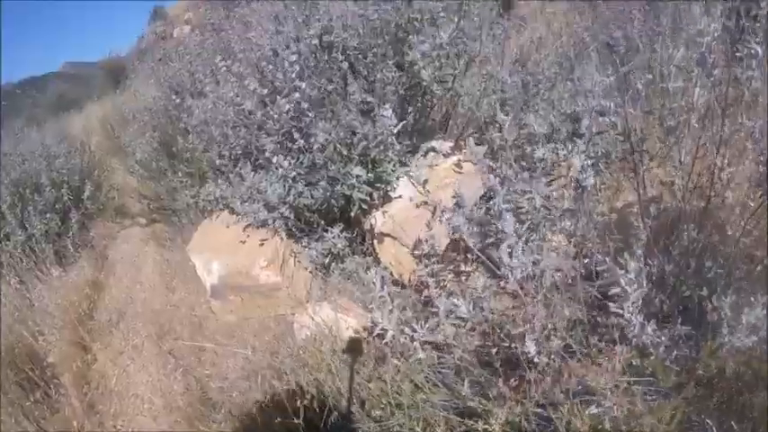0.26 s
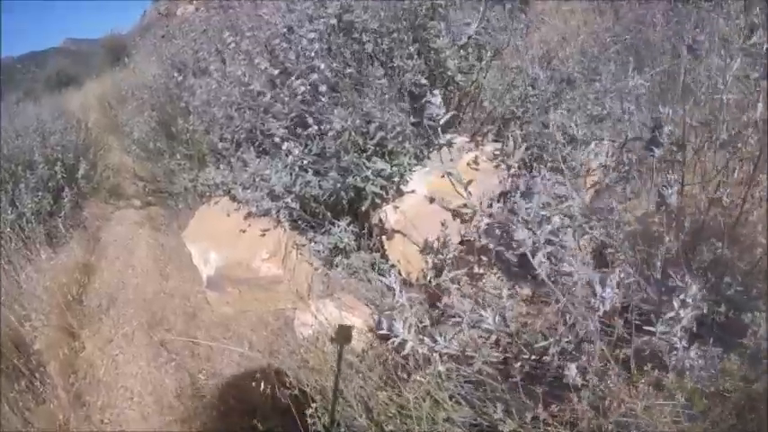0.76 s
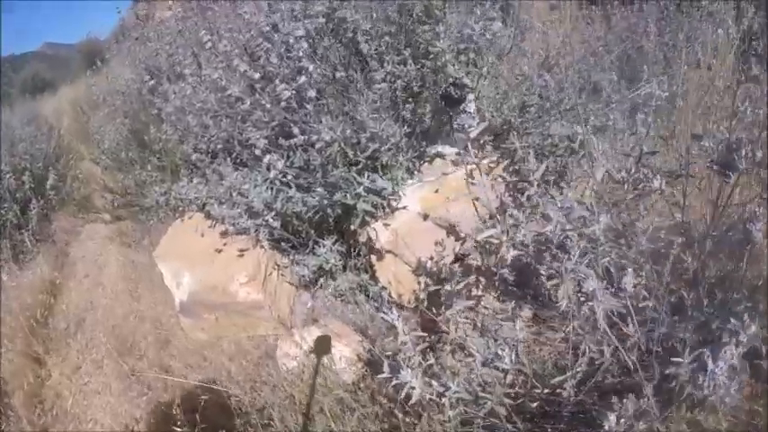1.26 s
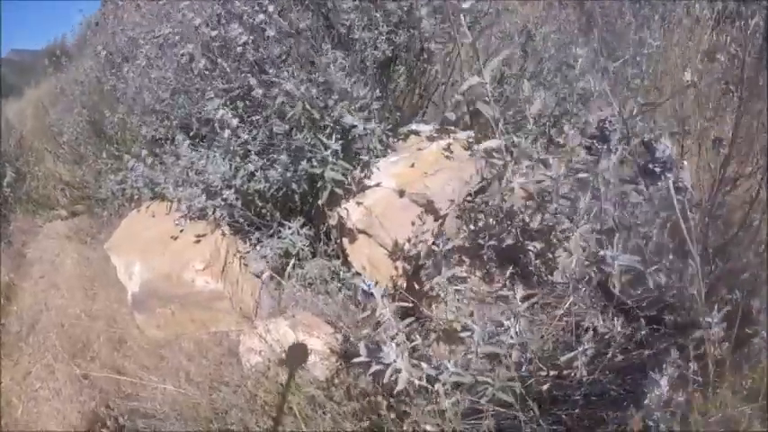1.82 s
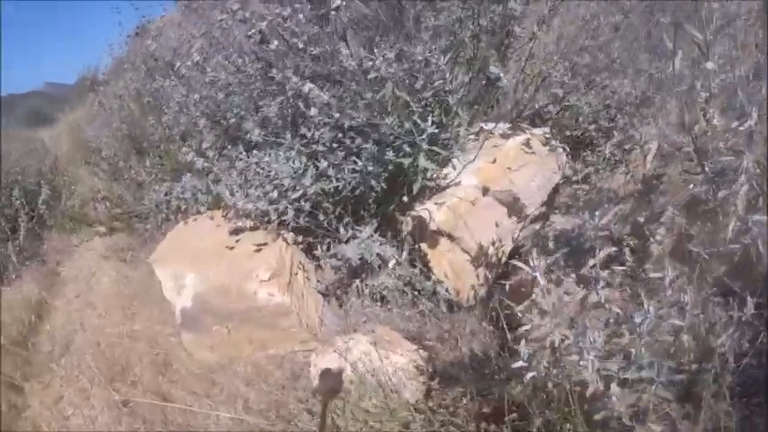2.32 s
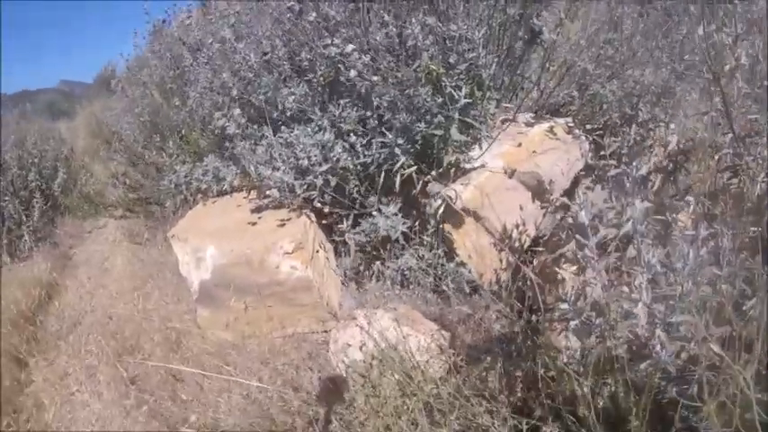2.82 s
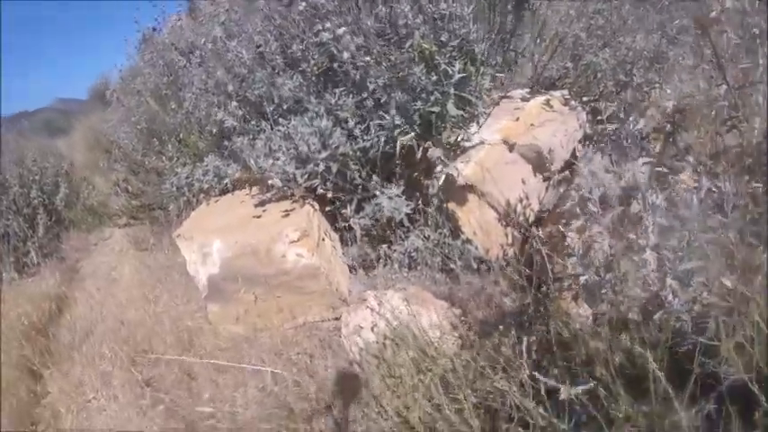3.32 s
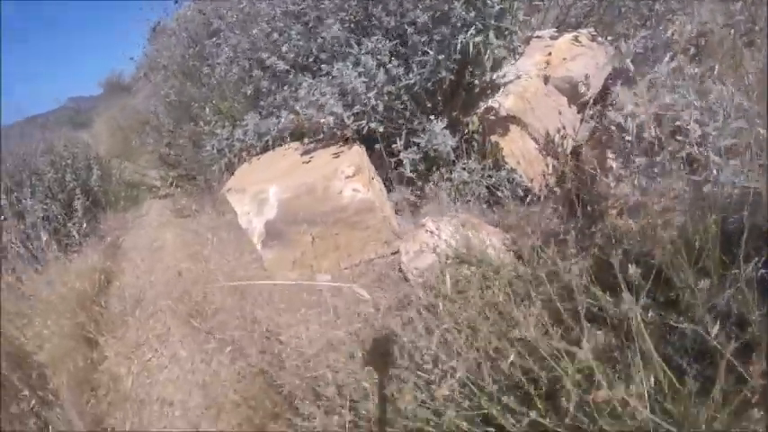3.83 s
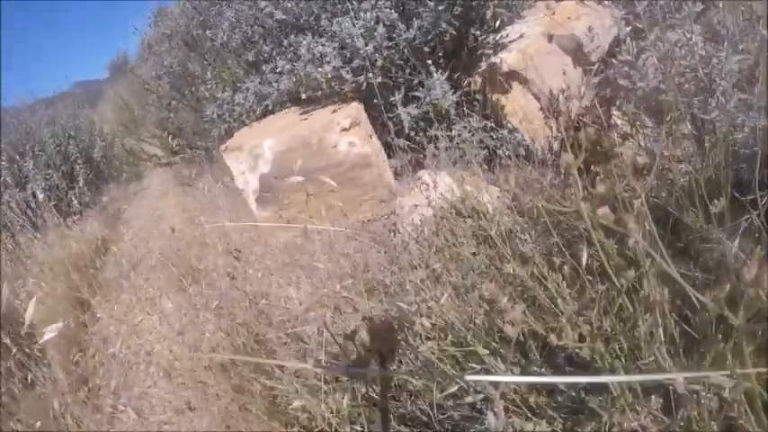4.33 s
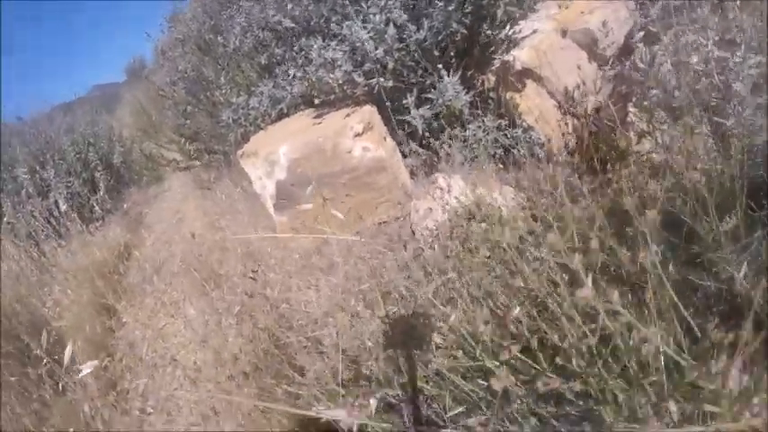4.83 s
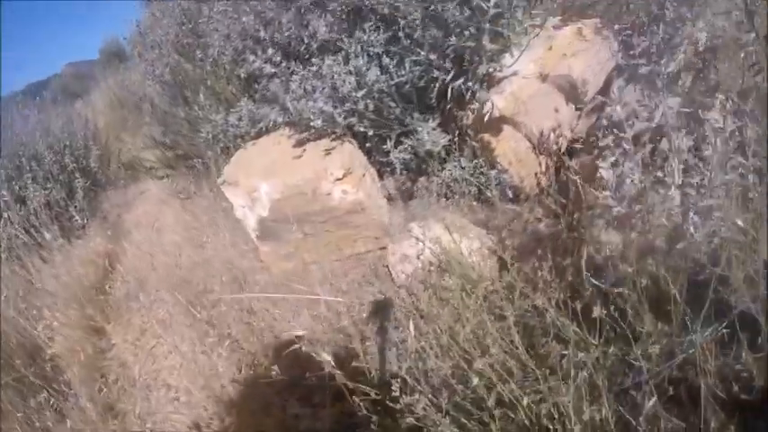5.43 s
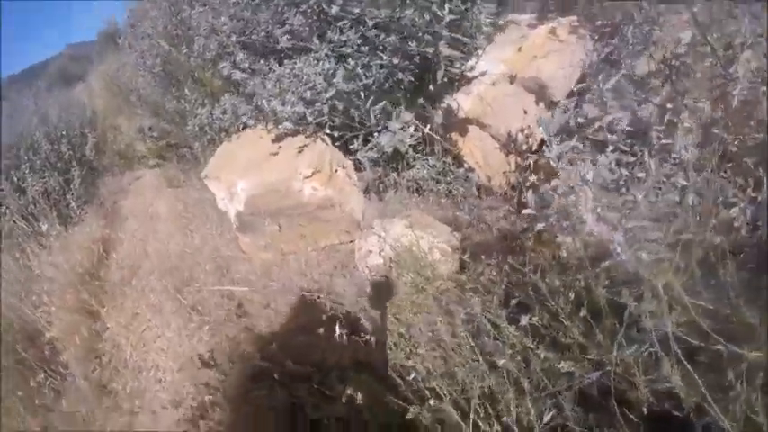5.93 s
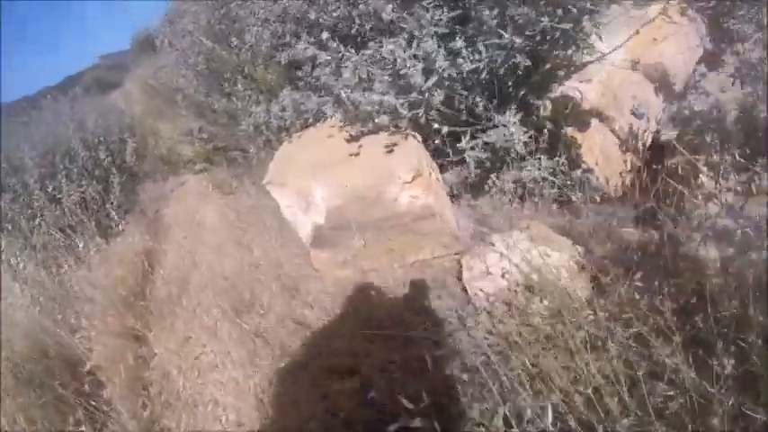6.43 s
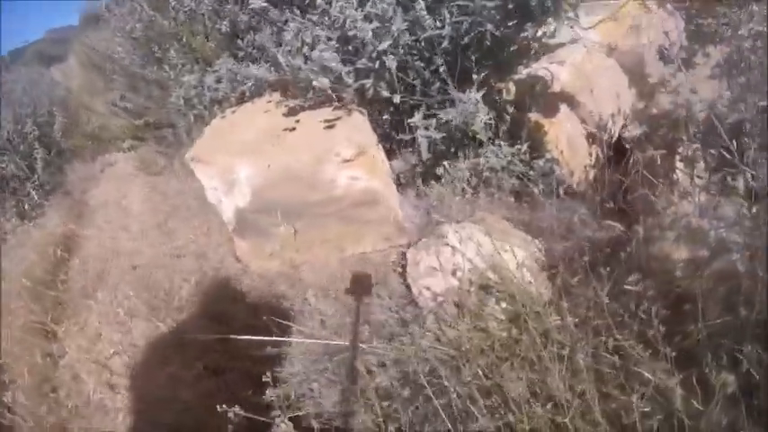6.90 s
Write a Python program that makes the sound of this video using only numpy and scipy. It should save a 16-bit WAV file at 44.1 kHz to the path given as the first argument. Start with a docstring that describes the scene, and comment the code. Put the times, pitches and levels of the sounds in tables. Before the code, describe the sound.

A rattlesnake buzzes from start to finish, about seven seconds, on an open trail among rocks and brush. The sound is a dry, high, very fast rattle that blurs into a hiss, slowing slightly and changing tone as the microphone moves. It is loudest around 2 seconds, drops noticeably from about 4 to 5 seconds, and comes back by 5.5 seconds, a little softer than at first.

Close up, the hand holding the microphone makes a low rumble with rubbing and soft thumps. Dull taps stand out near 1.7 and 2.3 seconds, and the rumble swells between 3 and 4.7 seconds. Small creaking ticks from the case are scattered throughout and cluster between 4 and 5 seconds, and one light plastic knock comes at 6.5 seconds. Very faint scuffs in dry grass occur near 2.3, 5.8 and 6.5 seconds, over a faint, even rush of air.

```python
"""A brushy trail among rocks, heard through the microphone of a hand-held camera.
Behind the rocks a rattlesnake buzzes: each tail stroke throws its loose segments together, and the
strokes slow a little as it goes on. Stone and brush scatter and colour the buzz differently as the
listener shifts about in the dry grass. Right at the microphone the hand rumbles, rubs and thumps,
and the case creaks in small ticks and knocks once. Faint open air lies under it all."""
import sys
import numpy as np
from scipy import signal
from scipy.fft import rfft, irfft, next_fast_len
from scipy.io import wavfile
from scipy.ndimage import uniform_filter1d, map_coordinates

SR = 44100
rng = np.random.default_rng(int(sys.argv[2]) if len(sys.argv) > 2 else 0)


def digitize_waveform(pressure):
    """Quantize a signal to 16-bit integers and store it at the path in sys.argv[1].

    Rows of a 2-D input are taken as channels; values are limited to [-1, 1].
    """
    field = np.atleast_2d(pressure).T
    bounded = np.clip(field, -1, 1)
    quanta = np.round(bounded * 32767).astype(np.int16)
    wavfile.write(sys.argv[1], SR, quanta)


N = 315756
TIME_S = np.arange(N) / SR


def amp(db):
    return 10 ** (np.asarray(db) / 20)


def unit_rms(x):
    return x / np.sqrt(np.mean(x ** 2) + 1e-20)


def curves(rows):
    """One value per sample for each column after the time."""
    times, *columns = np.transpose(rows)
    return [np.interp(TIME_S, times, column) for column in columns]


def wobble(knots_per_s):
    """A smooth random curve about zero."""
    knots = rng.standard_normal(int(N * knots_per_s / SR) + 4)
    return map_coordinates(knots, [TIME_S * knots_per_s])


def swell(centre_s, half_length_s):
    """A bell-shaped rise and fall of height 1."""
    return np.exp(-.5 * ((TIME_S - centre_s) / half_length_s) ** 2)


def surges(rest_db, events):
    """A resting level with (centre_s, level_db, half_length_s) swells added in power."""
    swell_power = sum((amp(db) * swell(s, length)) ** 2 for s, db, length in events)
    return np.sqrt(amp(rest_db) ** 2 + swell_power)


def filtered(x, response):
    """x through a complex response of frequency."""
    size = next_fast_len(N + SR // 2)
    return irfft(rfft(x, size) * response(np.fft.rfftfreq(size, 1 / SR)), size)[:N]


def colour(x, spectrum):
    """x shaped by (freq_hz, gain_db) points; rms 1."""
    freq_hz, gain_db = np.transpose(spectrum)
    return unit_rms(filtered(x, lambda hz: amp(np.interp(np.log(hz + 1), np.log(freq_hz), gain_db))))


def noise(spectrum):
    return colour(rng.standard_normal(N), spectrum)


def resonate(x, modes):
    """x through parallel (pitch_hz, width_hz, gain_db) resonances."""
    return filtered(x, lambda f: sum(amp(db) * 1j * f * width / (hz * hz - f * f + 1j * f * width)
                                     for hz, width, db in modes))


def steady(x, span_s):
    """x with its chance swells partly evened out; rms 1."""
    power = uniform_filter1d(x ** 2, max(int(span_s * SR), 1))
    return unit_rms(x / np.sqrt(abs(power) + 0.21))


def band_gain(f, bands):
    """Gain at f of bell-shaped (centre_hz, width_hz, gain_db) peaks and nulls."""
    return amp(sum(db * np.exp(-((f - hz) / width) ** 2) for hz, width, db in bands))


def add(track, start_s, sound):
    """Mix a sound into the track."""
    part = track[max(round(start_s * SR), 0):][:len(sound)]
    part += sound[:len(part)]


# air all around the trail: freq_hz, gain_db
AIR_SPECTRUM = [(30, -10), (200, 1), (420, 0.5), (600, -2.5), (1400, -3.5), (2400, -4), (5000, 2),
                (11000, -11), (14000, -17)]

def open_air(level_db=-54.5):
    """A faint even rush of open air over the hillside."""
    return amp(level_db) * noise(AIR_SPECTRUM)


# shoes in the grass below the microphone: centre_s, level_db, half_length_s
SHOE_SCUFFS = [(2.273, -62, 0.016), (2.34, -57, 0.036), (5.704, -60, 0.016), (5.831, -56.5, 0.014),
               (6.458, -61, 0.033)]
# dry stalks: freq_hz, gain_db
STRAW_SPECTRUM = [(150, 0), (400, 2), (1200, 5.5), (2400, -1), (5000, -14), (12000, -27)]

def grass_scuffs():
    """A shifting foot crushes dry stalks in a short crackly swell."""
    pressure = sum(amp(db) * swell(s, length) for s, db, length in SHOE_SCUFFS)
    crackle = rng.standard_normal(N) * amp(2.3 * wobble(400))
    return pressure * colour(crackle, STRAW_SPECTRUM)


# rumble of the moving microphone: freq_hz, gain_db
SWAY_SPECTRUM = [(12, -17), (20, -8), (35, -1), (46, 1), (57, -5), (72, -29), (110, -31), (250, -74)]
# the hand's constant slight sway: time_s, level_db
HAND_TREMOR = [(0, -49.5), (.35, -52.5), (.7, -47), (2.1, -46.5), (2.8, -44), (3.9, -45.5), (7.16, -44.5)]
# jolts of the arm: centre_s, level_db, half_length_s
ARM_JOLTS = [(1.63, -42.5, .07), (3.11, -38, 0.068), (3.43, -38, 0.046), (3.632, -34, 0.029),
             (4.332, -36.5, 0.054), (4.532, -34.5, 0.018), (4.702, -39.5, 0.066), (5.056, -42, 0.073),
             (5.833, -40, 0.073), (6.008, -39, 0.04), (6.12, -39, .028), (6.292, -41, 0.019),
             (6.902, -41, 0.081)]

def camera_sway():
    """The hand sways the camera into a deep rumble, more at each jolt."""
    rumble = steady(noise(SWAY_SPECTRUM), span_s=0.096)
    return surges(curves(HAND_TREMOR)[0], ARM_JOLTS) * rumble


# low resonances of the case around the microphone: pitch_hz, width_hz, gain_db
CASE_MODES = [(134.5, 23, 1.5), (209.4, 22, -14.5)]
# skin on the case, and the case's broad boom: freq_hz, gain_db
RUB_SPECTRUM = [(35, -22), (62, 3), (85, 0.5), (115, -4.5), (140, -21), (175, -33), (250, -44)]
BOOM_SPECTRUM = [(70, -52), (120, 1), (165, -6.5), (230, -14), (290, -29), (500, -33), (1200, -75)]
# drags of the skin: centre_s, level_db, half_length_s
SKIN_DRAGS = [(0.55, -53, .07), (0.78, -50, 0.07), (1.552, -50.5, 0.22), (2.368, -49.5, 0.059),
              (3.222, -46, 0.059), (3.57, -47, 0.042), (4.03, -55.5, .08), (5.2, -57, .08)]

def grip_rub(resting_rub_db=-55.5, boom_db=-60):
    """The hand rubs the case, which booms at two low resonances; uneven pressure wavers both levels."""
    rub = steady(noise(RUB_SPECTRUM), span_s=0.12)
    friction = rng.standard_normal(N)
    ring = unit_rms(resonate(friction, CASE_MODES))
    boom = steady(ring + colour(friction, BOOM_SPECTRUM), span_s=0.1)
    pressure = amp(wobble(12))
    return pressure * (surges(resting_rub_db, SKIN_DRAGS) * rub + amp(boom_db) * boom)


# the palm shifts on the case: centre_s, level_db, half_length_s, upper_mode_db
PALM_THUMPS = [(0.29, -52, 0.088, -28), (0.824, -57, 0.038, -9), (1.447, -57, .025, -15),
               (1.57, -48, 0.034, -9.5), (1.675, -47, .016, -18), (2.356, -50, 0.035, -15),
               (2.818, -57.5, 0.063, -15), (3.162, -50, 0.038, -2.5), (3.27, -50, 0.045, -14),
               (3.518, -51, 0.1, -7), (3.99, -54, 0.051, -7.5), (4.13, -55, 0.014, 4),
               (4.53, -51, 0.0074, -5), (4.663, -58.5, .03, -1), (4.812, -55, .012, -8),
               (5.25, -57, 0.042, -14), (6.074, -55, 0.056, -10), (6.273, -57, 0.017, -12),
               (6.48, -50.5, 0.051, -12.5)]
# skin brushing within a thump: freq_hz, gain_db
PALM_SPECTRUM = [(130, -23), (220, -1), (300, -1), (420, -6), (700, -20), (1500, -45)]

def palm_thumps(width_hz=27, skin_db=-8.5):
    """Each soft thump swells both case resonances, in a balance set by where the palm presses."""
    rings = []
    for hz, _, _ in CASE_MODES:
        mode = [(hz, width_hz, 0)]
        ring = resonate(resonate(rng.standard_normal(N), mode), mode)
        rings.append(steady(unit_rms(ring), span_s=0.05))
    lower, upper = rings
    skin = amp(skin_db) * noise(PALM_SPECTRUM)
    out = np.zeros(N)
    for s, db, length, upper_db in PALM_THUMPS:
        blend = (lower + amp(upper_db) * (upper + skin)) / np.hypot(1, amp(upper_db))
        out += amp(db) * swell(s, length) * blend
    return out


# sharper taps, right at the microphone: centre_s, peak_db, half_length_s
HAND_TAPS = [(1.378, -40, .003), (1.686, -33.5, .004), (2.346, -35, .003), (4.525, -42, .002)]

def hand_taps():
    """A tap of the hand gives the microphone one dull push, without ringing."""
    return sum(amp(db) * (((TIME_S - s) / length) ** 2 - 1) * swell(s, length)
               for s, db, length in HAND_TAPS)


# slips of the grip, close to the microphone: centre_s, snap_db, half_length_s
GRIP_SLIPS = [(0.1476, -43, .001), (0.371, -45, 0.0012), (2.2655, -47, 0.00077), (2.568, -47, 0.00092),
              (2.875, -47, 0.00076), (3.2982, -45.5, 0.00063), (3.59, -46, 0.00064), (4.1355, -42, 0.00061),
              (4.3548, -42.5, .0006), (4.4463, -42, 0.00049), (4.507, -46, .0007), (4.5647, -46.5, 0.0008),
              (4.6154, -45.5, .0006), (4.6661, -47, .0006), (4.698, -47.5, 0.00055), (4.724, -47, .0007),
              (4.7546, -50, .0007), (4.7845, -45, .0006), (4.8018, -46, .0007), (4.952, -48, .0007),
              (5.8186, -55, 0.00082), (6.393, -44, 0.00064)]
# the case after a slip: pitch_hz, gain_db, t60_s
CREAK_MODES = [(455, 0, 0.031), (670, 1.5, 0.017), (1220, -12, .015)]

def case_creaks(snap_hz=864, pitch_spread=.1, ring_spread_db=2.5, ring_rise_s=0.0026):
    """Each slip of the grip is one dull snap, after which the case rings for an instant."""
    lead = 128  # samples before the snap's centre
    out, t = np.zeros(N), np.arange(-lead, SR // 20) / SR
    after = np.maximum(t, 0)
    ring_rise = 1 - np.exp(-after / ring_rise_s)
    for s, db, length in GRIP_SLIPS:
        pitch_hz = snap_hz * (1 + pitch_spread * rng.standard_normal())
        snap = np.exp(-(t / length) ** 2) * np.cos(2 * np.pi * pitch_hz * t)
        ring = np.zeros(len(t))
        for hz, gain_db, t60 in CREAK_MODES:
            decay = amp(gain_db + ring_spread_db * rng.standard_normal() - 60 * after / t60)
            ring += decay * np.cos(2 * np.pi * (hz * t + rng.random()))
        add(out, s - lead / SR, amp(db) * (snap + ring * ring_rise))
    return out


# a fingertip on the case: start_s, gain_db
FINGER_KNOCKS = [(6.4803, -38)]
# the knocked plastic: pitch_hz, gain_db, t60_s
PLASTIC_MODES = [(354, -1, 0.044), (1480, -1, 0.024), (1700, -0.5, 0.026), (1810, -11, .025)]

def case_knock(rise_s=0.00067):
    """A fingertip knock rings the plastic case briefly."""
    out, t = np.zeros(N), np.arange(SR // 5) / SR
    ring = sum(amp(db - 60 * t / t60) * np.sin(2 * np.pi * hz * t) for hz, db, t60 in PLASTIC_MODES)
    for s, db in FINGER_KNOCKS:
        add(out, s, amp(db) * ring * (1 - np.exp(-t / rise_s)))
    return out


def brush_scatter(clicks, t60_s=0.29):
    """Twigs and stones scatter clicks into a diffuse tail; the band near 4.5 kHz comes most directly."""
    def direct_share(hz):
        return np.interp(hz, [2950, 4530, 5840, 7960], [0.22, 0.64, 0.49, 0.2])  # of the power

    t = np.arange(SR // 4) / SR
    energy = signal.oaconvolve(clicks ** 2, amp(-60 * t / t60_s) ** 2)[:N]
    diffuse = unit_rms(np.sqrt(abs(energy)) * rng.standard_normal(N))
    straight = filtered(clicks, lambda hz: np.sqrt(direct_share(hz)))
    scattered = filtered(diffuse, lambda hz: np.sqrt(1 - direct_share(hz)))
    return straight + scattered


# colour of five paths from the snake to the microphone: freq_hz, gain_db
OPEN_TONE = [(1500, -37), (2200, -29), (2750, -23), (3250, -16), (4300, -8), (5300, -1), (6200, 1.5),
             (7000, -8.5), (8600, -17.0), (10500, -31.5), (14000, -32.5)]
BESIDE_ROCK_TONE = [(1500, -31), (2200, -22), (2750, -24), (3250, -9.5), (4300, -7), (5300, 4.5),
                    (6200, -6), (7000, -17.5), (8600, -10.5), (10500, -32), (14000, -38)]
SCREENED_TONE = [(1500, -22), (2200, -15.5), (2750, -16), (3250, -4.5), (4300, -4.5), (5300, 3.5),
                 (6200, -2), (7000, -6.5), (8600, -4.5), (10500, -17.5), (14000, -47)]
THROUGH_GRASS_TONE = [(1500, -25.5), (2200, -20.5), (2750, -21), (3250, -7.5), (4300, -4.5), (5300, 1),
                      (6200, -8), (7000, -11.5), (8600, -12.5), (10500, -26.5), (14000, -40.5)]
OVER_GRASS_TONE = [(1500, -25), (2200, -17.5), (2750, -28.5), (3250, -4), (4300, -3), (5300, 2.5),
                   (6200, -4.5), (7000, -4.5), (8600, -12), (10500, -19), (14000, -40)]
# bands that echoes off stone and ground lift or cancel on each path: centre_hz, width_hz, gain_db
OPEN_BANDS = [(2090, 170, 13.5), (2900, 110, 6), (3660, 83, 2.5), (4400, 273, 9), (4776, 160, 8.5),
              (5360, 90, 2.5), (6000, 77, -0.5), (6720, 190, -10), (7710, 260, -7), (8120, 150, 5.5),
              (9100, 70, -3), (9830, 310, 6)]
BESIDE_ROCK_BANDS = [(3890, 340, 6), (4200, 150, -6.5), (4650, 110, 2.5), (4890, 100, -13), (5300, 49, -5),
                     (5630, 66, -8), (5730, 60, 2.5), (6000, 62, 4.5), (6470, 130, 4.5), (7000, 150, 6.5),
                     (7900, 110, 1.5), (8250, 180, -13), (8850, 180, -11.5)]
SCREENED_BANDS = [(2010, 93, 6.5), (2780, 59, -13), (3100, 70, -14), (3580, 64, -10), (3860, 140, 7.5),
                  (4080, 110, -6.5), (4720, 91, 1.5), (4920, 80, -13), (5440, 184, -15), (6400, 90, -6),
                  (6600, 90, 2.5), (7170, 70, -1), (7460, 140, 5), (8420, 160, -11), (9150, 150, -4)]
THROUGH_GRASS_BANDS = [(2820, 70, -10), (3880, 120, 6), (4250, 150, -11), (4780, 110, 2), (4920, 100, -16),
                       (5430, 70, 5), (5740, 54, 5), (6000, 120, 2), (6200, 90, -9), (6960, 130, 7),
                       (8240, 200, -8), (8540, 120, 4.5), (8800, 120, -3.5)]
OVER_GRASS_BANDS = [(2520, 110, 9), (2930, 110, 12), (3210, 120, -8.5), (4950, 110, 1.5), (5700, 120, -2.5),
                    (6440, 70, 4), (6800, 70, -9), (7920, 130, 1), (8370, 160, 7.5)]

def trail_paths(rattle, position, drift_share=.007):
    """Position crossfades the paths; the swaying microphone slides their echo bands in frequency."""
    paths = [(OPEN_TONE, OPEN_BANDS), (BESIDE_ROCK_TONE, BESIDE_ROCK_BANDS),
             (SCREENED_TONE, SCREENED_BANDS), (THROUGH_GRASS_TONE, THROUGH_GRASS_BANDS),
             (OVER_GRASS_TONE, OVER_GRASS_BANDS)]
    stretch = 1 + drift_share * wobble(3)
    bin_hz, frame_s, frames = signal.stft(rattle, SR, nperseg=1024)
    drifted_hz = bin_hz[:, None] / np.interp(frame_s, TIME_S, stretch)
    out = np.zeros(N)
    for number, (tone, bands) in enumerate(paths):
        share = np.clip(1 - abs(position - number), 0, 1)
        echoed = signal.istft(frames * band_gain(drifted_hz, bands), SR)[1][:N]
        out += share * colour(echoed, tone)
    return out


# brief shifts in the buzz's colour at the microphone: centre_s, half_length_s, centre_hz, width_hz, gain_db
BUZZ_COLOUR_SHIFTS = [(0.2, .4, 3740, 110, 4.5), (0.3, .4, 2880, 130, 3), (1.95, .22, 7660, 200, 3),
                      (2.15, 0.17, 5870, 300, 3), (2.22, 0.26, 3850, 190, -9), (2.375, 0.028, 5700, 550, 3),
                      (2.6, 0.23, 7460, 170, 5), (3.93, 0.24, 5080, 130, 7), (5.22, 0.23, 5100, 130, 3),
                      (3.3, .3, 8500, 170, 2), (4.65, .35, 8750, 170, 4), (5.453, .3, 3800, 220, 2.5),
                      (5.7, 0.22, 8480, 130, 2), (6.436, 0.093, 3770, 200, 6.5)]

def buzz_colour_shifts(buzz):
    """Narrow bands of the buzz briefly swell or dip."""
    out = buzz.copy()
    for s, length, hz, width, db in BUZZ_COLOUR_SHIFTS:
        coloured = filtered(buzz, lambda f: band_gain(f, [(hz, width, db)]))
        out += np.exp(-((TIME_S - s) / length) ** 2) * (coloured - buzz)
    return out


# harder hits of the rattle: centre_s, gain_db
HARD_HITS = [(0.5855, 6), (0.7026, 10.5), (1.5152, 11), (1.649, 6), (3.036, 4), (3.7508, 7), (5.464, 7.5),
             (5.6885, 7)]

def rattle_clacks(half_length_s=0.00064):
    """Now and then the segments hit squarely, in one harder burst."""
    force = sum(amp(db) * swell(s, half_length_s) for s, db in HARD_HITS)
    burst = noise([(3000, -18), (4400, -2), (6200, 0), (7500, -11), (11000, -20)])
    return force * steady(burst, span_s=0.00077)


# beat of the tail: time_s, stroke_rate_hz
TAIL_STROKES = [(0, 138.4), (1.3, 135), (2, 133.9), (2.6, 130.9), (2.9, 128.9), (4.3, 128.3), (5.4, 125.3),
                (6.4, 124.2), (7.16, 124)]

def rattle_clicks(clicks_per_stroke=160, side_db=1.15, rebound_share=.25, rebound_s=.0022):
    """Each tail stroke throws the loose segments together: a cluster of clicks, then a weaker rebound."""
    strokes_done = np.cumsum(curves(TAIL_STROKES)[0]) / SR
    starts_s = np.flatnonzero(np.diff(np.floor(strokes_done)))[:, None] / SR
    strokes = len(starts_s)
    stroke_late, stroke_force = rng.standard_normal((strokes, 2, 1)).swapaxes(0, 1)
    click_late, click_force = rng.standard_normal((strokes, 2, clicks_per_stroke)).swapaxes(0, 1)
    pitch_hz = rng.uniform(800, 14500, (strokes, clicks_per_stroke))
    phase = rng.random(pitch_hz.shape)
    # each segment owns a 2 kHz range of pitch and lands early or late, harder or softer
    segment = (pitch_hz // 2000).astype(int)
    segment_draws = rng.standard_normal((2, strokes, segment.max() + 1))
    segment_late, segment_force = np.take_along_axis(segment_draws, segment[None], axis=2)
    delay_s = rebound_s * (rng.random(pitch_hz.shape) < rebound_share)
    click_s = starts_s + .0002 * stroke_late + .0003 * segment_late + .0008 * click_late + delay_s
    side = (-1) ** np.arange(strokes)[:, None]  # left and right strokes differ in strength
    click_db = side_db * side + 0.45 * stroke_force + 0.57 * segment_force + 0.6 * click_force
    samples = np.arange(40)  # a click is a sine burst under a millisecond long
    tones = np.sin(2 * np.pi * (pitch_hz[..., None] * samples / SR + phase[..., None]))
    clicks = amp(click_db)[..., None] * np.hanning(len(samples)) * tones
    index = (np.round(click_s * SR).astype(int)[..., None] + samples) % N
    return unit_rms(np.bincount(index.ravel(), clicks.ravel(), N))


# the microphone's way along the trail: time_s, position, level_db
# positions: 0 open, 1 beside the rock, 2 screened, 3 through grass, 4 over the grass
MICROPHONE_WALK = [(0, 0, -38.5), (.8, 0, -37.5), (1.25, 0, -38), (2.05, 0.15, -36), (2.35, 0.67, -36),
                   (2.75, 1, -37.5), (3.45, 1, -38.3), (3.77, 1.25, -39.7), (4.3, 2, -45.5),
                   (5.08, 2, -45.5), (5.52, 3.5, -40.3), (6.28, 3, -41), (6.5, 3.5, -39), (6.85, 4, -39.5),
                   (7.16, 4, -40.5)]

def rattlesnake():
    """The rattle's buzz crosses brush and rocks on its way to the moving microphone."""
    position, level_db = curves(MICROPHONE_WALK)
    rattle = brush_scatter(rattle_clicks()) + amp(-3) * rattle_clacks()
    buzz = buzz_colour_shifts(trail_paths(rattle, position))
    return amp(level_db) * steady(buzz, span_s=0.2)


def scene():
    """The snake behind the rocks, handling noise up close and the trail around, in mono."""
    creaks = case_creaks()
    snake = rattlesnake()
    handling = camera_sway() + grip_rub() + palm_thumps() + hand_taps() + creaks + case_knock()
    return (snake + handling + grass_scuffs() + open_air())[None]


def record(dry, top_hz=14020):
    """The camera keeps nothing above its band limit."""
    return filtered(dry[0], lambda hz: hz < top_hz)[None]


dry = scene()
out = record(dry)
digitize_waveform(out)
```